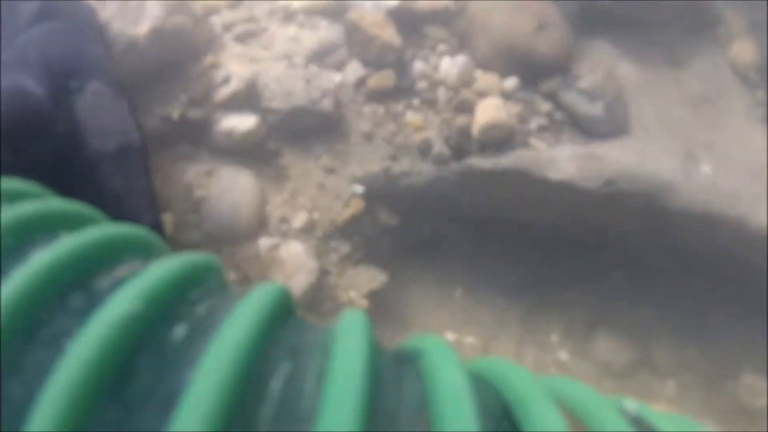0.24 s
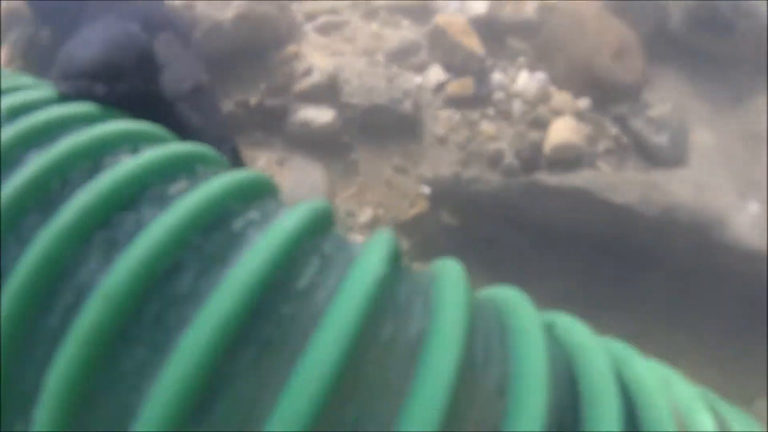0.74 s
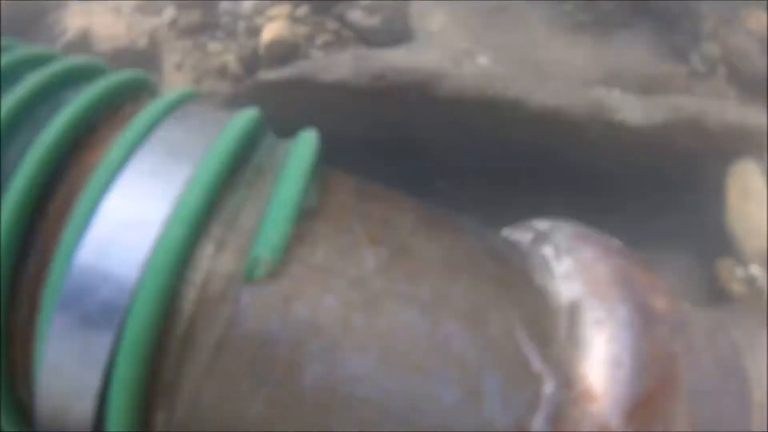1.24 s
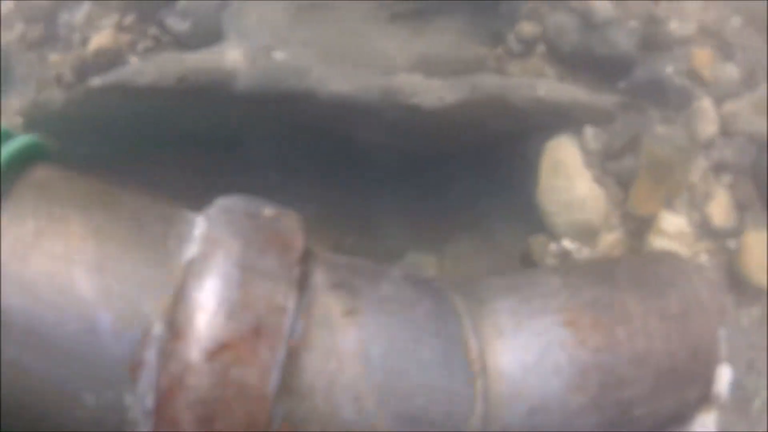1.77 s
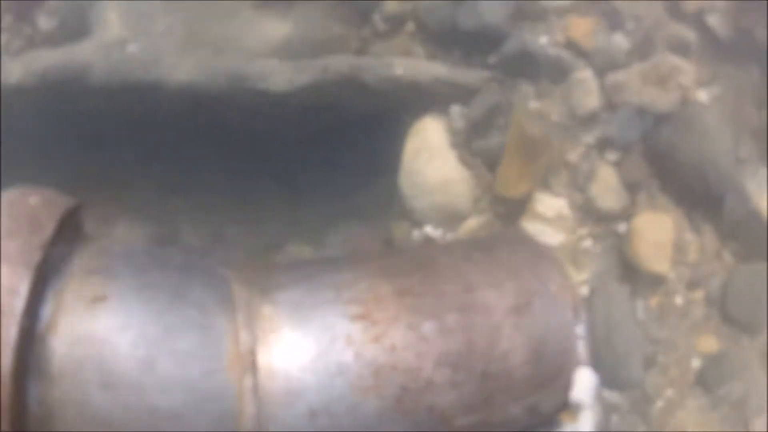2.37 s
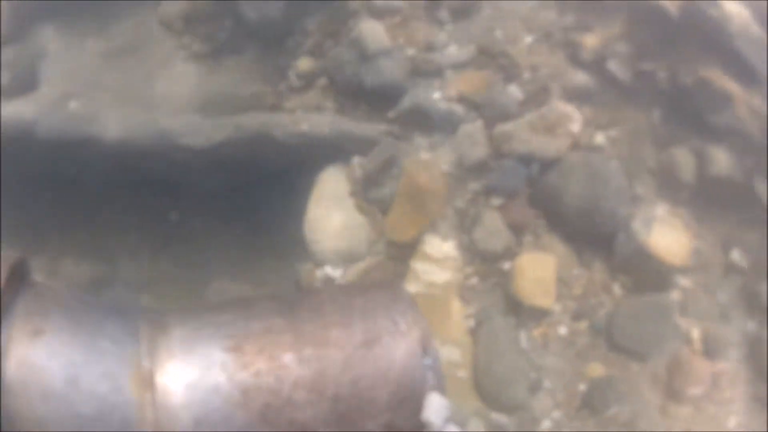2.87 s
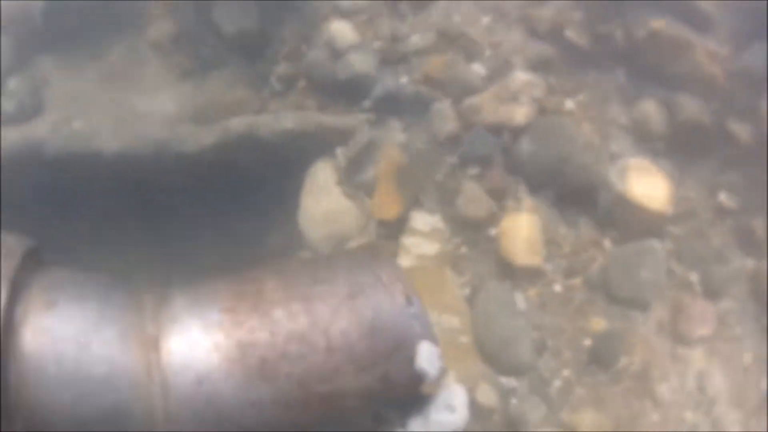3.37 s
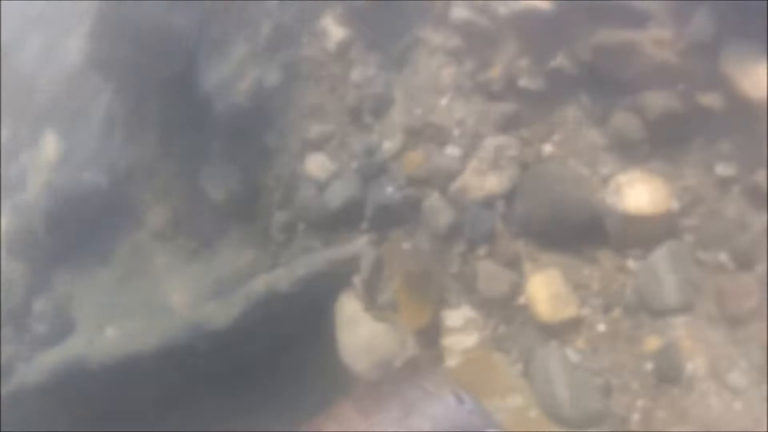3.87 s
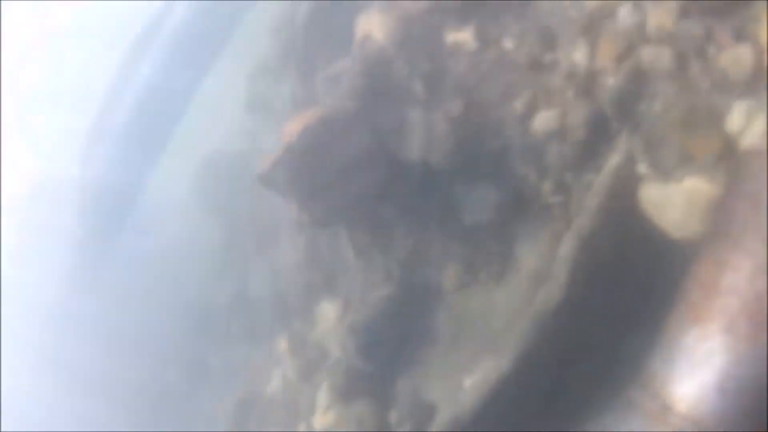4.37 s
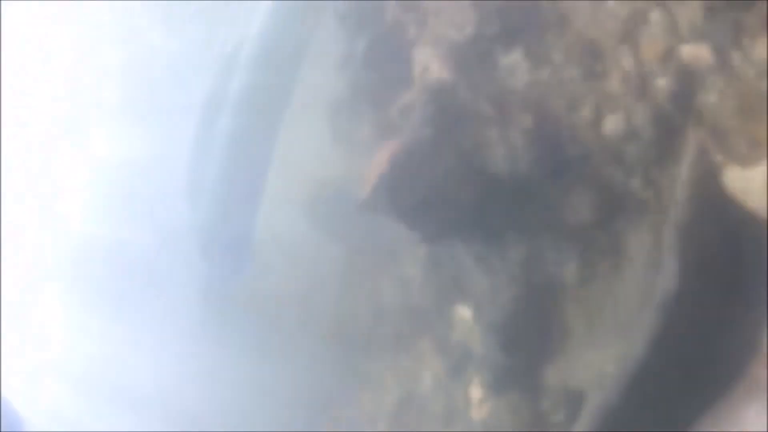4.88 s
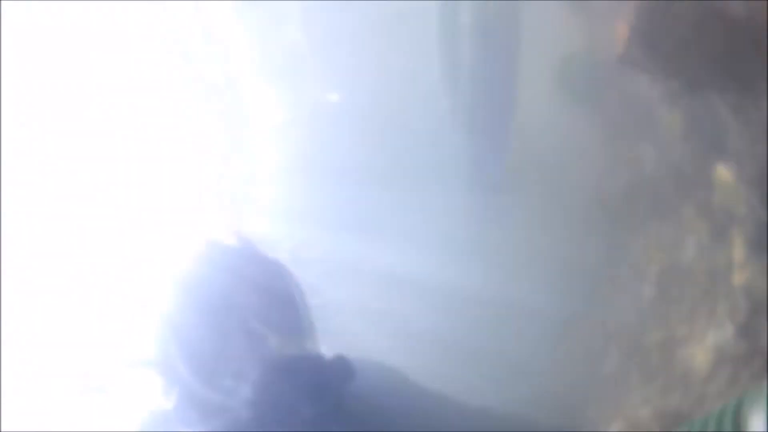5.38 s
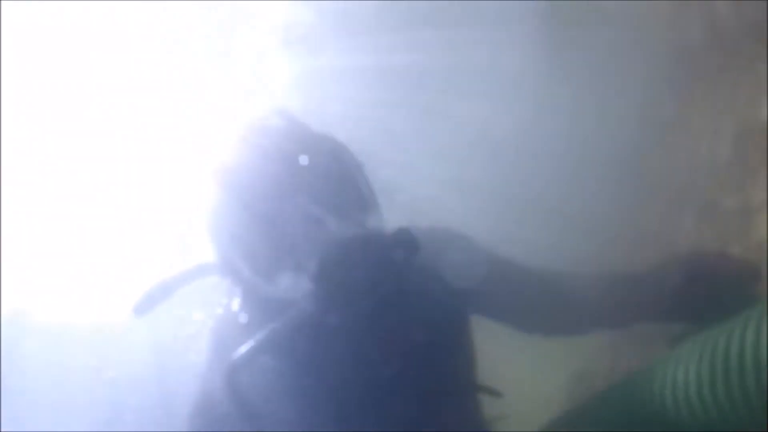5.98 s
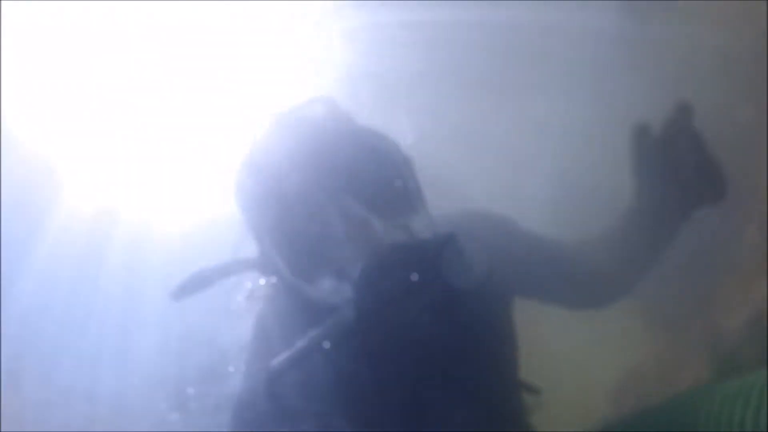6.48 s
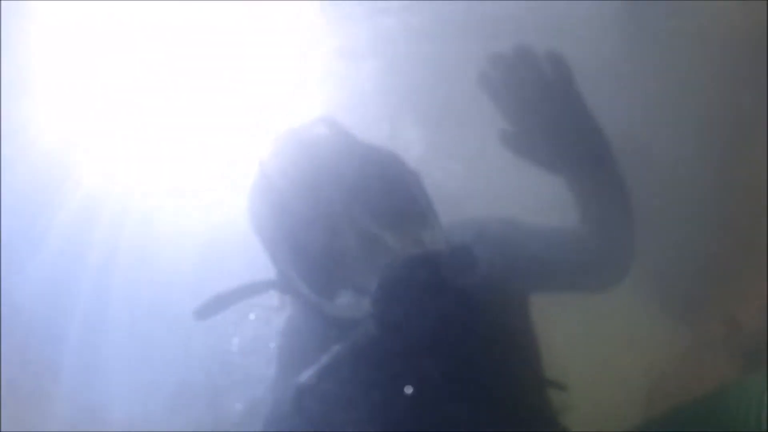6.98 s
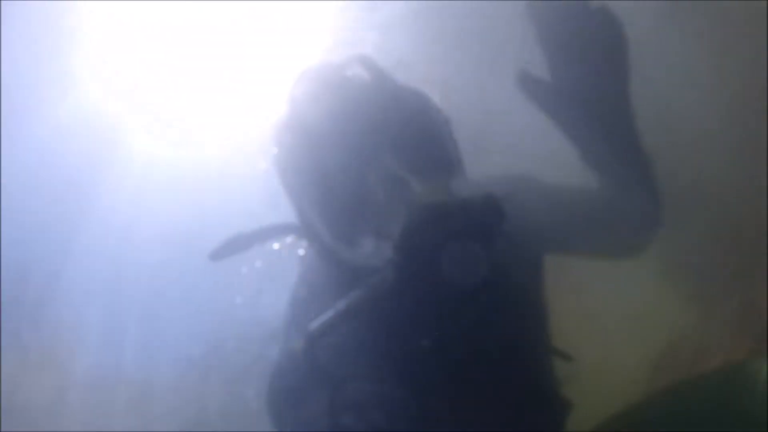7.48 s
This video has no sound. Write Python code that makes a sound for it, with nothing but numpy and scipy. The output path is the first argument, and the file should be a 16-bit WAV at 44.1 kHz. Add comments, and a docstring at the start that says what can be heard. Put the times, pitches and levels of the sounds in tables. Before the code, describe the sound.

A suction dredge is heard close up underwater, through a housed microphone that keeps overloading. Sand and gravel rush through a steel nozzle with a hollow roar and a grainy, ringing hiss, fluttering rapidly at first with the pump engine's low throb. At about 0.7 seconds the sound drops to a faint hiss, snapping back at 1.3. From 1.4 to 3.1 seconds, clusters of stones knock in the hose with low, distorted booms, interrupted by brief gaps and clicks. Another dropout lasts from 3.1 to 3.6, dotted with snaps, followed by a few more knocks. From 4 seconds the hiss shifts in tone and mostly cuts out, leaving short bursts and sharp snaps until about 5.4. The rush then returns hissier, still stuttering on and off irregularly, and drops away at about 7.5 seconds.

```python
"""A suction dredge, heard under water by a small camera in a sealed housing. Sand and gravel rush
through the steel nozzle, stones knock in the hose and the pump engine throbs. The slow, strong pressure
swings overload the microphone: its diaphragm (the thin skin that picks up sound) is pinned against
its stops again and again, so the sound cuts out, stutters and snaps."""
import sys
import numpy as np
from scipy.fft import rfft, irfft, next_fast_len
from scipy.io import wavfile
from scipy.ndimage import uniform_filter1d, map_coordinates

SR = 44100
rng = np.random.default_rng(int(sys.argv[2]) if len(sys.argv) > 2 else 0)


def to_wav(s):
    """Save 16-bit WAV."""
    ch = np.atleast_2d(s).T  # columns
    pcm = np.round(np.clip(ch, -1, 1) * 32767)  # PCM
    wavfile.write(sys.argv[1], SR, pcm.astype(np.int16))


N = 340893
T = np.arange(N) / SR

# how strong the flow is: (time [s], sand hiss [dB], nozzle roar [dB], hose boom [dB])
FLOW_LEVELS = [(0.601, -27, -19, -26.5), (1.4, -31.5, -22, -20), (1.801, -32, -23.5, -7),
               (2.4, -30.5, -18.5, -13.5), (2.6, -36.5, -24.5, -6.5), (2.9, -30.5, -20.5, -13.5),
               (3.7, -30.5, -18, -17.5), (4.05, -33.5, -22.5, -32.5), (4.602, -29, -21, -21),
               (4.999, -28.5, -26.5, -34.5), (5.601, -23.5, -21, -29), (6.1, -25, -23.5, -31),
               (7.0, -24, -21.5, -28), (7.4, -25.5, -24.5, -28.5)]
# where housing and water ring, with the camera facing the nozzle, half turned or turned away:
# (pitch [Hz], width [Hz], level [dB])
ROAR_FACING = [(440, 170, -8.5), (694, 190, -1.5), (877, 118, 2.5), (940, 770, -13)]
ROAR_TURNED = [(450, 205, -5.5), (732, 182, 0), (1019, 116, -8.5), (1323, 310, -7.5)]
HISS_FACING = [(2534, 230, 2.5), (4080, 960, -3), (5145, 490, 4.5), (6920, 760, -11), (7990, 1200, -12.5),
               (12100, 4400, -30)]
HISS_HALF_TURNED = [(3166, 820, 0.5), (3970, 500, -4), (4525, 430, -2.5), (5700, 2100, -14),
                    (8150, 580, -15), (11900, 5400, -43)]
HISS_TURNED = [(3300, 750, -2), (4685, 375, -2.5), (6080, 2000, -16), (8510, 330, -19)]
# stones that make the hose boom: (middle time [s], strength [dB])
STONE_KNOCKS = [(1.408, 7.5), (1.476, 8), (1.522, 9.5), (1.577, 10), (1.592, 5.5), (1.645, 9.5), (1.698, 7),
                (1.836, 9.5), (2.137, 10.5), (2.211, 10), (2.23, 9), (2.28, 4.5), (2.362, 6.5), (2.452, 6),
                (2.799, 9.5), (2.859, 7.5), (2.875, 4.5), (2.92, 8), (3.1, 5.5), (3.12, 9.5), (3.666, 4),
                (3.728, 3), (3.782, 7), (3.889, 11.5)]
# the engine's tones: (multiple of the firing rate, level [dB])
ENGINE_TONES = [(2, -11.5), (3, -19.5), (4, -20.5), (5, -18.5)]
# the sound cuts out; a short row inside a longer one lets a burst of sand through:
# (start [s], end [s], gain [dB])
CUTOUTS_AND_BURSTS = [(0.397, 0.404, -22), (0.472, 0.479, -22), (0.485, 0.494, -20), (0.635, 0.653, -28),
                      (0.671, 1.317, -41), (1.0993, 1.1025, -16), (1.978, 2.053, -35), (2.217, 2.226, -22),
                      (2.238, 2.247, -24), (2.504, 2.558, -22), (2.574, 2.587, -22), (3.14, 3.627, -42),
                      (3.3602, 3.3635, -14), (3.97, 4.012, -36), (4.018, 4.038, -35), (4.075, 4.101, -40),
                      (4.113, 4.122, -38), (4.166, 4.4, -53), (4.403, 4.519, -45), (4.549, 4.591, -40),
                      (4.602, 4.612, -35), (4.626, 4.651, -17), (4.664, 4.67, -26), (4.702, 4.718, -40),
                      (4.718, 4.757, -23), (4.766, 4.828, -36), (4.857, 4.897, -22), (4.929, 4.94, -51),
                      (4.996, 5.009, -27), (5.174, 5.2, -33), (5.2, 5.335, -50), (5.342, 5.368, -41),
                      (5.348, 5.351, -6), (5.402, 5.434, -20), (5.468, 5.48, -14), (5.49, 5.522, -29),
                      (5.531, 5.538, -44), (5.57, 5.622, -39), (5.599, 5.603, -5), (5.663, 5.682, -27),
                      (5.719, 5.737, -32), (5.808, 5.857, -19), (5.908, 5.959, -15), (5.971, 6.059, -27),
                      (6.153, 6.168, -24), (6.234, 6.243, -30), (6.249, 6.258, -20), (6.279, 6.312, -32),
                      (6.393, 6.413, -30), (6.514, 6.531, -35), (6.539, 6.604, -38), (6.65, 6.716, -37),
                      (6.724, 6.775, -36), (6.871, 6.901, -36), (6.946, 7.048, -39), (7.205, 7.288, -31),
                      (7.223, 7.227, -8), (7.295, 7.318, -38), (7.342, 7.353, -27), (7.36, 7.385, -17),
                      (7.39, 7.458, -42), (7.458, 7.468, -14), (7.503, 7.507, -26), (7.51, 7.5135, -30),
                      (7.5155, 7.692, -43)]
# near a stop the microphone flicks on and off:
# (start [s], end [s], gain when off [dB], random swing that shuts it)
CHATTER_SPANS = [(2.555, 2.718, -12, -0.29), (4.122, 4.165, -35, .3), (4.828, 5.14, -18, 0.7),
                 (5.617, 5.72, -47, .7), (6.07, 6.51, -29.5, 1.05), (7.06, 7.2, -36, 1.12)]
# the diaphragm flips from one stop to the other: (time [s], strength [dB], sweep length [ms])
DIAPHRAGM_FLIPS = [(0.991, -32.5, 0.24), (1.216, -38, 0.28), (1.3008, -3.5, 0.24), (1.3028, -8.5, 0.32),
                   (1.3081, -5.5, 0.4), (1.999, -3, 0.35), (2.005, -8.5, 0.67), (2.021, -4, 0.33),
                   (2.037, -20.5, 1.5), (2.59, -5, 0.46), (2.721, -5.5, 0.47), (3.147, -6, .6),
                   (3.304, -19, 0.41), (3.31, -9.5, 0.39), (3.321, -13, 0.54), (3.469, -8.5, 1.1),
                   (3.49, -29, 0.46), (3.497, -19.5, 0.39), (3.5025, -25, 0.32), (3.984, -7, 0.4),
                   (3.998, -6.5, 0.14), (4.006, -7, 0.35), (4.025, -15, 1.2), (4.087, -16, 1.2),
                   (4.111, -2, 0.33), (4.184, -15, 0.51), (4.194, -16, 0.93), (4.384, -7, 0.23),
                   (4.401, -10.5, 0.74), (4.421, -12.5, 0.96), (4.43, -12, 1.86), (4.577, -15, 0.85),
                   (4.601, -6.5, 0.42), (4.605, -4.5, 0.41), (4.787, -2.5, 0.096), (4.797, -7, 0.32),
                   (4.812, -14, 0.38), (5.161, -5.5, 0.44), (5.228, -6.5, 0.4), (5.36, -4.5, 0.64),
                   (7.251, -25, 0.67), (7.413, -31, 0.71)]

# the camera's moves: (start [s], end [s])
LEAVE_HOSE, TURN_ASIDE, TURN_AWAY = (.7, 1.3), (3.87, 4.195), (5.67, 6.42)
FIRING_HZ, HOSE_HZ = 27.1, 175.5


def amp(db):
    """Turn decibels into a number to multiply by."""
    return 10 ** (np.asarray(db) / 20)


def filtered(x, response):
    """Scale each frequency f in x by response(f)."""
    size = next_fast_len(N + SR // 2)
    return irfft(rfft(x, size) * response(np.fft.rfftfreq(size, 1 / SR)), size)[..., :N]


def wobble(rate):
    """A smooth curve through `rate` random points a second."""
    return map_coordinates(rng.standard_normal(N // 100), [T * rate])


def ringing(modes, grain_db=0):
    """Noise of average strength 1 that rings at the given pitches; grain_db makes it grainy."""
    peak = lambda f, hz, width: (f * width) ** 2 / ((hz * hz - f * f) ** 2 + (f * width) ** 2)
    shape = lambda f: np.sqrt(sum(amp(2 * db) * peak(f, hz, width) ** 1.95 for hz, width, db in modes))
    grains = rng.standard_normal(N) * amp(grain_db * wobble(400))
    sound = filtered(grains, shape)
    return sound / np.sqrt(np.mean(sound ** 2) + 1e-20)


def flow(column):
    """One column of the flow table as a gain that sways by about 1 dB."""
    rows = np.array(FLOW_LEVELS)
    return amp(np.interp(T, rows[:, 0], rows[:, column]) + wobble(5))


def turn(span, before, after):
    """Fade from one sound to another as the camera turns."""
    angle = np.interp(T, span, [0, np.pi / 2])
    return np.cos(angle) * before + np.sin(angle) * after


def sand_and_gravel(sand_db=2.5, gravel_db=3):
    """Grains of uneven size make the housing ring; the tone changes as the camera turns."""
    turned_hiss = turn(TURN_AWAY, ringing(HISS_HALF_TURNED, sand_db), ringing(HISS_TURNED, sand_db))
    hiss = turn(TURN_ASIDE, ringing(HISS_FACING, sand_db), turned_hiss)
    roar = turn(TURN_ASIDE, ringing(ROAR_FACING, gravel_db), ringing(ROAR_TURNED, gravel_db))
    near_hose = np.interp(T, LEAVE_HOSE, [1, 0])
    hiss += near_hose * amp(-13) * ringing([(2543, 88, 0)])  # a thin ring close to the hose
    puff = amp(4.9 * np.exp(-((T - 7.48) / .01) ** 2))  # a puff of sand hits the housing
    return flow(column=1) * puff * hiss + flow(column=2) * roar


def hose_boom(stone_half_s=.0095):
    """The water in the hose booms on one note; each stone swells it past what the microphone can take."""
    boom = flow(column=3) * ringing([(HOSE_HZ, 45, 0)])
    phase = 2 * np.pi * np.cumsum(HOSE_HZ * (1 + .16 * wobble(120))) / SR
    swell = sum(amp(db) * np.exp(-((T - s) / stone_half_s) ** 4) for s, db in STONE_KNOCKS)
    swell *= amp(2.3 * wobble(130))
    slow_push = .57 * wobble(70)
    return boom + swell * (np.sin(phase) + slow_push)


def suction_surge():
    """The suction pulls unevenly and rumbles, a little more once the camera has turned."""
    return amp(np.interp(T, TURN_ASIDE, [-13.5, -12.5])) * wobble(90)


def engine_throb():
    """The engine's steady firing makes low tones, weaker away from the hose."""
    phase = 2 * np.pi * FIRING_HZ * T
    throb = sum(amp(db) * np.sqrt(2) * np.sin(multiple * phase + rng.uniform(0, 2 * np.pi))
                for multiple, db in ENGINE_TONES)
    return throb * amp(np.interp(T, LEAVE_HOSE, [0, -6]))


def diaphragm(pressure, stop=.6, hardness=8, fold=1.8):
    """The diaphragm follows the pressure; pushed past a stop, its signal falls back toward zero."""
    return pressure / (1 + np.abs(pressure / stop) ** hardness) ** (fold / hardness)


def camera_ticks(per_second=30, first_s=.012, pitch_hz=1700):
    """A faint, regular tick inside the camera: each is one short, dull swing."""
    age = (T - first_s) % (1 / per_second)
    return amp(-59 - 60 * age / .002) * np.sin(2 * np.pi * pitch_hz * age)


def microphone_gain(close_until_s=.5, firing_db=-27):
    """When pinned, the microphone goes quiet within a millisecond; a gain of 1 means it is free."""
    stutters = (wobble(260) > 1.55) & (T >= close_until_s) & (T < TURN_AWAY[0])
    db = np.where(stutters, -20., 0)
    swing = wobble(170)
    for start, end, off_db, threshold in CHATTER_SPANS:
        db[(T > start) & (T < end) & (swing > threshold)] = off_db
    # close to the hose, each engine firing pins it for about 3 ms
    firings = np.arange(.0372, close_until_s, 1 / FIRING_HZ)
    for s in firings[1::2] - .009:  # every second firing also pins it just ahead
        db[np.abs(T - s) < .0065 / 2] = firing_db
    scatter_s = rng.uniform(-1, 1, (len(firings), 2)) * .0012
    for s, (late, longer) in zip(firings, scatter_s):
        db[np.abs(T - s - late) < (.003 + longer) / 2] = firing_db
    for start, end, gain_db in CUTOUTS_AND_BURSTS:
        span = slice(round(start * SR), round(end * SR))
        db[span] = gain_db + 8 * np.exp(-(T[span] - start) / .0081)  # starts 8 dB higher, then settles
    return amp(uniform_filter1d(db, size=30))


def leaking_hiss(free):
    """The pinned microphone gives a broad hiss, which sinks as its gain gets very low."""
    shape = lambda f: np.sqrt((1 + (430 / (f + 30)) ** 4) / (1 + (f / 1500) ** 2))
    hiss = filtered(rng.standard_normal(N), shape)
    return amp(-34) * (1 - free) * free ** .53 * hiss


def snaps(sand, faint_db=-20):
    """The diaphragm flips from stop to stop, each time the other way, letting sand noise through."""
    out, half = np.zeros(N), 200
    t = np.arange(-half, half) / SR
    for k, (s, db, sweep_ms) in enumerate(DIAPHRAGM_FLIPS):
        here = slice(round(s * SR) - half, round(s * SR) + half)
        grit = amp(1 - .6 * db) * (db > faint_db)  # weaker flips carry more sand, the faintest none
        pressure = -(-1) ** k * np.sinh(1200 * t / sweep_ms)
        snap = diaphragm(pressure + grit * sand[here])
        out[here] += amp(db + 2) * np.hanning(2 * half) * snap / np.abs(snap).max()
    return out


def scene():
    """Free, the diaphragm swings between its stops; pinned, it only leaks some sand, rumble and hiss."""
    sand = sand_and_gravel()
    rumble = hose_boom() + suction_surge()
    free = microphone_gain()
    swinging = diaphragm(sand + rumble + engine_throb())
    leaking = amp(-1.5) * (sand + rumble / 2)
    blend = free * swinging + (1 - free) * leaking
    return (free * blend + leaking_hiss(free) + snaps(sand))[None]


def record(dry):
    """The camera adds its tick, cuts the bass, rings a little near 4 kHz and drops the highest treble."""
    cut_hz, damping, ring_hz, width_hz, top_hz = 504, 1.88, 4040, 1460, 15900
    low_cut = lambda f: -f * f / (cut_hz ** 2 - f * f + 1j * damping * cut_hz * f)
    ring = lambda f: 1 + .41j * f * width_hz / (ring_hz ** 2 - f * f + 1j * f * width_hz)
    high_cut = lambda f: np.clip((top_hz - f) / 600 + .5, 0, 1)
    return filtered(dry + camera_ticks(), lambda f: low_cut(f) * ring(f) * high_cut(f))


dry = scene()
out = record(dry)
to_wav(out)
```